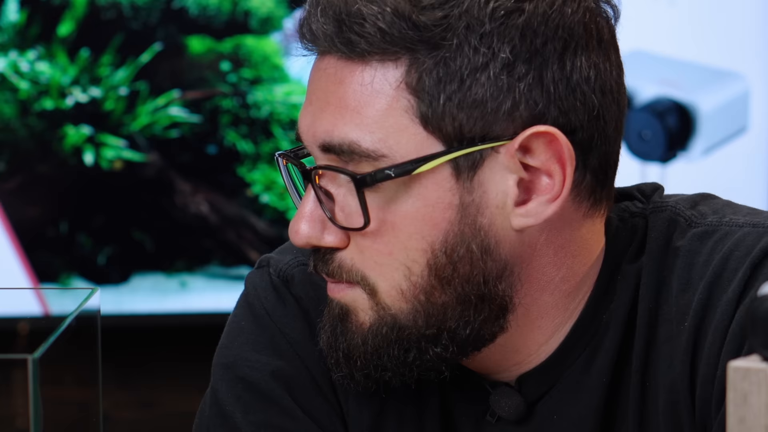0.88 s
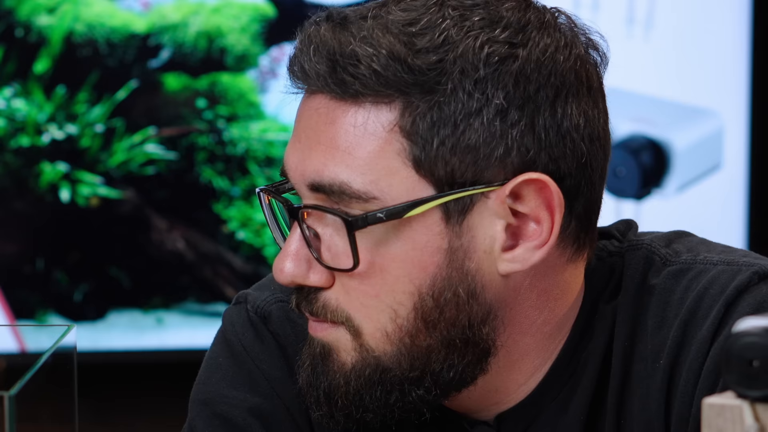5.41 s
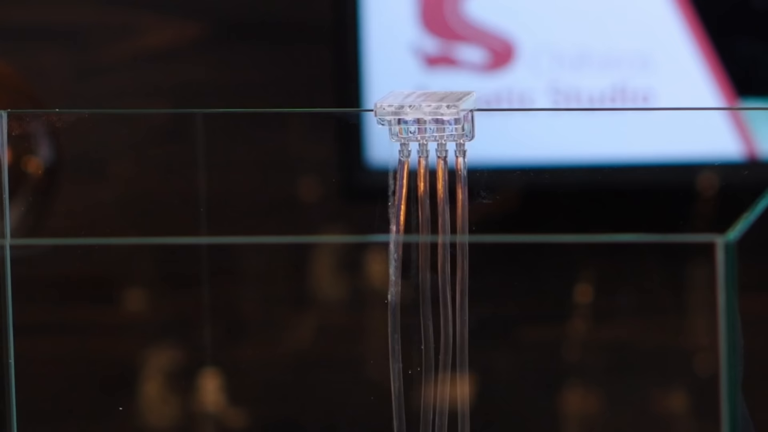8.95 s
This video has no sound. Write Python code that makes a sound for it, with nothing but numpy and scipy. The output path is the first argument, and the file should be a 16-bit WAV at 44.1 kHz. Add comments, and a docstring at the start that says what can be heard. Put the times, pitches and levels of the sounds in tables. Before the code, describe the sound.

Steady pulsing hum and rapid gear ticking of a small pump, with soft hiss, fine water spray and faint bubble pings.

```python
"""A small three-roller dosing pump runs on a desk and feeds a thin stream into an aquarium.
From the start each roller rubs and squeezes the tube: the gears load up, rattle and tick, and the desk
drones under them, over soft hiss and crackling spray. Just before 1 s comes a faint squeak, and bubbles
ping here and there. Around 5 s and again near 6.4 s the treble turns hollow and the hiss swells,
the second time with a low rumble. At 6.6 s the whole sound comes round again as a loop."""
import sys
import numpy as np
from scipy import signal
from scipy.io import wavfile
from scipy.ndimage import uniform_filter1d

SR = 44100
rng = np.random.default_rng(int(sys.argv[2]) if len(sys.argv) > 2 else 0)


def persist_wave(psi):
    """Save psi, clipped to +-1, as 16-bit WAV."""
    counts = np.round(np.clip(psi, -1, 1) * 32767).astype(np.int16)
    wavfile.write(sys.argv[1], SR, np.atleast_2d(counts).T)


N = 436149

PASS_HZ, ROLLER_COUNT = 12.412, 3  # a pass is one roller squeezing the tube
# how far the rotor trails an even pace: t/s, lag/s
ROTOR_LAG = [(0, .066), (1.45, .0702), (3.5, .068), (4.67, .0726), (5.15, .0716), (6.3, .0655), (6.6, .066)]
# gear load, peaking at the roller's bite, midway and at the release: middle/pass, width/pass, rise/dB
GEAR_LOAD = [(0.29, 0.41, 5.5), (0.091, 0.041, 4.5), (0.347, 0.056, 2), (0.58, 0.034, 5)]
# the hardest slaps, as the tube snaps open behind a roller: t/s, relative level/dB, treble offset/dB
HARD_SLAPS = [(0.0695, -37.5, -14), (0.2499, -37.0, -16), (0.7154, -36.0, -10), (0.7967, -37.5, -21),
              (1.2006, -36.5, -9), (1.5236, -38.0, -15), (1.6059, -37.5, -9), (1.6849, -37.0, -13),
              (2.128, -38.5, -19), (2.1681, -37.5, -13), (2.2655, -39.0, -18), (2.4094, -37.5, -14),
              (2.6511, -33.5, -17), (2.731, -36.5, -12), (2.8921, -35.0, -11), (2.9722, -36.0, -20),
              (3.134, -38.5, -21), (3.2144, -36.5, -18), (3.3749, -34.0, -10), (3.456, -37.0, -19),
              (3.6166, -36.5, -9), (3.7793, -37.5, -13), (3.8589, -34.5, -10), (3.94, -36.0, -15),
              (4.1017, -35.0, -12), (4.3057, -36.0, -16), (4.3447, -35.5, -14), (5.071, -37.5, -8),
              (5.3907, -39.0, -12), (5.552, -37.0, -12), (6.3537, -38.0, -12), (6.3712, -33.5, -12),
              (6.5957, -37.0, -12)]
# resonances of the pump's shell: f/Hz, width/Hz, gain/dB
SHELL_MODES = [(2240, 110, 12), (3156, 185, 5.4), (3730, 190, 9), (4920, 460, 9.1)]
# a neutral colour: f/Hz, level/dB
FLAT = [(20, 0), (20000, 0)]


def amp(db):
    """Decibels to gain."""
    return 10 ** (np.asarray(db) / 20)


def unit_rms(x):
    """Scales to an rms of 1."""
    return x / np.sqrt(np.mean(x ** 2) + 1e-20)


def add(mix, s, sound):
    """Mixes a sound in at s seconds."""
    part = mix[max(round(s * SR), 0):][:len(sound)]
    part += sound[:len(part)]


def clicks(times, sizes):
    """One impulse of each size at each time."""
    at = np.round(times * SR).astype(int)
    inside = (at >= 0) & (at < N)
    return np.bincount(at[inside], sizes[inside], N)


def humps(table, at, period=np.inf):
    """Bell-shaped swells in dB from rows of middle, width and rise; they may repeat with a period."""
    middle, width, db = np.transpose(table)[:, :, None]
    away = abs(at - middle) % period
    away = np.minimum(away, period - away)
    return (db * np.exp(-(away / width) ** 2)).sum(axis=0)


def ring(x, colour, modes=(), size=16384):
    """Plays x through a minimum-phase body with this broad colour and these resonances."""
    hz = abs(np.fft.fftfreq(size, 1 / SR))
    points, levels = np.transpose(colour)
    db = np.interp(np.log(hz + 1), np.log(points), levels)
    for centre, width, height in modes:
        db = db + height / (1 + (2 * (hz - centre) / width) ** 2)
    spectrum = np.exp(np.conj(signal.hilbert(np.log(amp(db)))))
    response = np.fft.ifft(spectrum).real
    return signal.oaconvolve(x, response[:size // 2])[:N]


def room(x, wet_db, t60):
    """Adds sparse reflections from the desk, the tank and the near walls; comes out at unit rms."""
    t = np.arange(SR // 2) / SR
    echoes = rng.standard_normal(len(t)) * (rng.random(len(t)) < 3000 / SR)
    tail = echoes * (t > .003) * np.exp(-np.log(1000) * t / t60)
    wet = signal.oaconvolve(x, tail / np.linalg.norm(tail))[:N]
    return unit_rms(x + amp(wet_db) * wet)


def lag_at(t):
    """Seconds by which the rotor trails an even pace at time t."""
    return np.interp(t, *np.transpose(ROTOR_LAG))


def pass_time(passes):
    """Time at which the rotor has made this many roller passes."""
    on_beat = passes / PASS_HZ
    return on_beat + lag_at(on_beat)


def rotor_position():
    """Roller passes made so far, sample by sample."""
    t = np.arange(N) / SR
    return (t - lag_at(t)) * PASS_HZ


def pass_numbers():
    """Numbers of the roller passes, from just before the start."""
    return np.arange(-1, int(N / SR * PASS_HZ) + 1)


def pulses(pattern, accents, spread_db, clear_s):
    """A pattern of hits in every rotor turn, never quite alike; accents replace hits within clear_s."""
    place, db, scatter = np.transpose(pattern)
    turn_starts = pass_numbers()[1::ROLLER_COUNT, None] - ROLLER_COUNT
    turn_starts = np.vstack([turn_starts, turn_starts[-1] + ROLLER_COUNT])
    late, hard = rng.standard_normal((2, len(turn_starts), len(pattern)))
    times = (pass_time(turn_starts + place) + scatter * late).ravel()
    levels = (db + spread_db * hard).ravel()
    accent_s, accent_db = np.transpose(accents)[:2]
    free = abs(times[:, None] - accent_s).min(axis=1) > clear_s
    return clicks(times[free], amp(levels[free])) + clicks(accent_s, amp(accent_db))


def gear_teeth(load_depth, repeat_share, per_pass=96):
    """Gear teeth knock under the load; part of their unevenness returns with every rotor turn."""
    # the three rollers load the gears unequally: level/dB
    roller_db = [0.73, 0.45, 1.36]
    tooth = (pass_numbers()[:, None] * per_pass + np.arange(per_pass)).ravel()
    per_turn = ROLLER_COUNT * per_pass
    wear, offset = rng.standard_normal((2, per_turn))[:, tooth % per_turn]
    force = np.sqrt(repeat_share) * wear + np.sqrt(1 - repeat_share) * rng.standard_normal(len(tooth))
    passes = (tooth + offset / 2) / per_pass
    load_db = load_depth * humps(GEAR_LOAD, passes, period=1)
    load_db += np.take(roller_db, tooth // per_pass % ROLLER_COUNT)
    return clicks(pass_time(passes), force * amp(load_db))


def desk_drone(sink_db_per_s=230):
    """Roller shoves and gear vibration drive the desk through the pump's feet, softer as the rotor lags."""
    # shoves in every rotor turn: position/passes, relative level/dB, timing scatter/s
    thumps = [(.185, -0.5, 0.00056), (.4, -4, 0.00046), (.63, -2, 0.00061), (1.22, -3, 0.00051),
              (1.41, -5, 0.00069), (1.62, -1.5, 0.00079), (2.235, -3, 0.00084), (2.62, -2, 0.00042)]
    # the loudest throbs of the low drone: t/s, relative level/dB
    throbs = [(.65, -3), (1.085, 1.5), (1.778, 1.5), (2.212, 3.5), (3.225, 4), (3.707, 2.5), (5.487, 2),
              (6.005, 6), (6.122, 4), (6.367, 1), (6.563, 2.5)]
    # the desk's boomy colour: f/Hz, level/dB
    desk = [(18, -56), (35, -35), (52, -33.5), (75, -8.5), (102, -7.5), (135, -14.5), (165, -8),
            (205, -2.5), (225, 1), (340, -0.5), (365, -6), (420, -12), (520, -23.5), (900, -52.5)]
    # its resonances: f/Hz, width/Hz, gain/dB
    desk_modes = [(257, 18, 3), (295, 16, 12), (340, 12, 6.5)]
    pulsing = unit_rms(ring(pulses(thumps, throbs, spread_db=1.5, clear_s=.008), desk, desk_modes))
    rumble = unit_rms(ring(gear_teeth(load_depth=.4, repeat_share=.4), desk, desk_modes))
    lag = lag_at(np.arange(N) / SR)
    level_db = -31.5 - sink_db_per_s * (lag - lag[0])
    return amp(level_db) * unit_rms(pulsing + amp(2.5) * rumble)


def gear_rattle():
    """The meshing teeth ring the plastic gearbox."""
    # the gearbox's midrange colour: f/Hz, level/dB
    gearbox = [(200, -16.5), (480, -11), (620, 0), (850, 2.5), (960, .5), (1170, 1), (1400, -7),
               (1660, -16), (1870, -3.5), (2250, -7.5), (2650, -19.5), (5000, -23), (7500, -22),
               (16000, -27.5)]
    # its resonances: f/Hz, width/Hz, gain/dB
    gearbox_modes = [(656, 24, 5.5), (732, 34, 6.5), (838, 30, 2.5), (888, 34, 4.5), (1005, 28, 4.5),
                     (1253, 42, 5), (1885, 170, 3.6)]
    mesh = ring(gear_teeth(load_depth=1.15, repeat_share=.18), gearbox, gearbox_modes)
    return amp(-43.3) * room(mesh, wet_db=-13, t60=.08)


def stray_slaps(per_s=34, range_db=7.5):
    """Loose slaps at random moments, more of them while the gears are loaded."""
    load = unit_rms(amp(humps(GEAR_LOAD, rotor_position(), period=1)))
    hits = rng.random(N) < per_s * load / SR
    return hits * amp(-42.5 - range_db * rng.random(N))


def shell_spot(hits, detune=.05, spread_db=3):
    """The shell rings a little differently at every spot where it is struck."""
    # the shell's bright, clicky colour: f/Hz, level/dB
    shell = [(400, -13), (900, -16), (1600, -21), (1950, -2), (2300, -4.5), (2650, -12.5), (3300, 1),
             (4350, -5.5), (5200, -3.5), (5900, -22), (7500, -26), (9200, -7.5), (13000, -20), (16000, -23)]
    shifts = rng.uniform(-1, 1, (len(SHELL_MODES), 2))
    modes = [(hz * (1 + detune * up), width, db + spread_db * loud)
             for (hz, width, db), (up, loud) in zip(SHELL_MODES, shifts)]
    return ring(hits, shell, modes)


def backlash_ticks(spots=12, rebound_s=.0011, rebound_db=-3.5, shell_gain_db=21.5):
    """The gears slap across their play, rebound once and ring the shell at one of several spots."""
    # slaps in every rotor turn: position/passes, relative level/dB, timing scatter/s
    backlash = [(.04, -38, .0003), (.128, -43.5, .0007), (.255, -44, .0009), (.548, -58, .0004),
                (1.052, -39.5, .0005), (1.135, -44.5, 0.00056), (1.262, -44, 0.00078),
                (1.544, -40.5, .0003), (2.039, -37.5, .0003), (2.112, -42, 0.00046), (2.27, -40.5, .002),
                (2.54, -45.5, 0.00033)]
    slaps = pulses(backlash, HARD_SLAPS, spread_db=1, clear_s=.003) + stray_slaps()
    at = np.flatnonzero(slaps)
    gaps = rebound_s * rng.uniform(.5, 1.5, len(at))
    rebounds = slaps[at] * amp(rebound_db) * rng.choice([-1, 1], len(at))
    struck_spot = rng.integers(0, spots, len(at))
    ticks = np.zeros(N)
    for spot in range(spots):
        here = struck_spot == spot
        ticks += shell_spot(clicks(at / SR, slaps[at] * here) + clicks(at / SR + gaps, rebounds * here))
    return amp(shell_gain_db) * np.std(ticks) * room(ticks, wet_db=-8.5, t60=.1)


def tube_rub():
    """Each roller drags over the tube with a soft, pulsing fizz that rings the shell."""
    # drag as the roller meets the tube and as it leaves: middle/pass, width/pass, rise/dB
    drag_swells = [(0.99, 0.24, 7), (.46, .16, 10.5)]
    # colour of the friction: f/Hz, level/dB
    friction = [(1000, -12), (1600, -3), (2000, 0), (2700, 0.5), (3500, 0.5), (6000, -1), (9200, -8),
                (12500, 0), (16000, -19)]
    drag = amp(humps(drag_swells, rotor_position(), period=1)) * rng.standard_normal(N)
    return amp(-56) * unit_rms(ring(drag, friction, SHELL_MODES))


def hiss():
    """A soft, steady bed of hiss, with a bright sizzle that swells twice and a rumble that swells once."""
    # colour of the bed: f/Hz, level/dB
    bed_colour = [(30, -10), (150, 16), (1000, 8), (2700, 3), (4800, 2), (6100, -2.5), (7400, -3),
                  (8700, -0.5), (11000, 2.5), (12600, -6.5), (14000, 2), (16000, -21)]
    # its treble peaks: f/Hz, width/Hz, gain/dB
    bed_peaks = [(6330, 110, 3), (6670, 350, 13.3), (14550, 350, 3)]
    # colour of the sizzle: f/Hz, level/dB
    sizzle_colour = [(2000, -20), (3900, -5), (4900, -3), (6200, -1), (7300, -11), (9500, -22),
                     (12000, -25), (16000, -20)]
    # colour of the rumble: f/Hz, level/dB
    rumble_colour = [(25, -45), (55, -10), (90, -6), (150, -1), (400, -51), (2000, -74)]
    t = np.arange(N) / SR
    sizzle_db = -68.5 + humps([(5.05, .55, 4.2), (6.35, .21, 10)], t)
    rumble_db = -51 + humps([(6.45, .075, 11)], t)
    bed = unit_rms(ring(rng.standard_normal(N), bed_colour, bed_peaks))
    sizzle = unit_rms(ring(rng.standard_normal(N), sizzle_colour))
    rumble = unit_rms(ring(rng.standard_normal(N), rumble_colour))
    return amp(-52.5) * bed + amp(sizzle_db) * sizzle + amp(rumble_db) * rumble


def spray(per_s=140, spread_db=4, clump_db=4, decay_s=.0057):
    """Tiny droplets land in louder and softer clumps, each a short burst of fizz."""
    # the spray's airy colour: f/Hz, level/dB
    fizz_colour = [(2000, -29), (5500, -1), (9000, 0), (12500, 4), (16000, -14)]
    t = np.arange(SR // 40) / SR
    clumps = unit_rms(uniform_filter1d(rng.standard_normal(N), size=5000))
    drop_db = spread_db * np.minimum(rng.exponential(size=N), 3) + clump_db * np.clip(clumps, -2, 2)
    drops = amp(drop_db) * (rng.random(N) < per_s / SR)
    envelope = signal.oaconvolve(drops, np.exp(-t / decay_s))[:N]
    return amp(-63) * unit_rms(ring(envelope * rng.standard_normal(N), fizz_colour))


def tube_snaps(edge_gain_db=10, decay_s=.0023):
    """The tube springs open with each of the hardest slaps and gives it a bright edge."""
    # colour of that edge: f/Hz, level/dB
    edge_colour = [(2000, -19), (5000, 5), (7500, -11.5), (13000, 0.5), (16000, -9)]
    t, edge = np.arange(SR // 50) / SR, np.zeros(N)
    for s, db, treble_db in HARD_SLAPS:
        burst = np.exp(-t / decay_s) * rng.standard_normal(len(t))
        add(edge, s, amp(db + treble_db + edge_gain_db) * burst)
    return ring(edge, edge_colour)


def squeak(start_s=.74):
    """A faint, wavering whistle far up in the treble, ending in a lower chirp."""
    # the whistle's glide: t/s from the squeak's start, f/Hz, level/dB
    whistle = [(0, 11900, -63), (.03, 11450, -60.5), (.12, 11050, -57.5), (.16, 11400, -62),
               (.22, 12750, -61), (.26, 12450, -61), (.3, 12650, -62)]
    # the chirp's glide: t/s from the squeak's start, f/Hz, level/dB
    chirp = [(.275, 7050, -57), (.295, 7280, -54), (.32, 7100, -59)]
    out = np.zeros(N)
    for glide in (whistle, chirp):
        s, hz, db = np.transpose(glide)
        t = np.arange(s[0], s[-1], 1 / SR)
        waver = 1 + .003 * unit_rms(uniform_filter1d(rng.standard_normal(len(t)), size=60))
        cycles = np.cumsum(np.interp(t, s, hz) * waver) / SR
        add(out, start_s + s[0], amp(np.interp(t, s, db)) * np.sin(2 * np.pi * cycles))
    return out


def faint_bubbles(count=30, per_s=.7, typical_hz=7600, spread_octaves=.12, db=-54, splash_db=-8):
    """Cues for small bubbles at random moments, all of about one size."""
    times = np.cumsum(rng.exponential(size=count)) / per_s
    pitches = typical_hz * 2 ** (spread_octaves * rng.standard_normal(count))
    return [(s, db, hz, splash_db) for s, hz in zip(times, pitches)]


def bubbles(attack_s=.0003, decay_s=.0083, rise_per_s=1.5):
    """A drop splashes, and its tiny bubble rings briefly with rising pitch."""
    # the clearest bubbles in the tank: t/s, level/dB, f/Hz, splash against the ping/dB
    clear_bubbles = [(.906, -48, 6160, 0), (.917, -50, 5070, 3), (1.407, -49, 7400, -2),
                     (1.759, -49, 7600, -4), (3.558, -45, 7500, -5), (4.29, -48, 6200, -2),
                     (5.57, -53, 6260, 6), (5.749, -44.5, 5400, 1), (6.222, -43, 4400, -5),
                     (6.37, -42, 4900, 0)]
    t, out = np.arange(SR // 20) / SR, np.zeros(N)
    envelope = np.exp(-t / decay_s) * (1 - np.exp(-t / attack_s))
    for s, db, hz, splash_db in clear_bubbles + faint_bubbles():
        ping = np.sin(2 * np.pi * np.cumsum(hz * (1 + rise_per_s * t)) / SR)
        band = signal.butter(2, [.87 * hz, 1.28 * hz], "bandpass", fs=SR)
        splash = unit_rms(signal.lfilter(*band, rng.standard_normal(len(t))))
        add(out, s, amp(db) * envelope * (ping + amp(splash_db) * splash))
    return out


def hollowed(x):
    """For two stretches the treble takes on a hollow, notched colour."""
    # the hollow stretches: start/s, end/s, fade/s
    stretches = [(4.53, 5.58, 0.092), (6.217, 6.52, .04)]
    # their peaks and notches: f/Hz, width/Hz, gain/dB
    hollow_modes = [(2150, 200, -2.5), (2620, 190, 4.5), (3300, 330, -2), (4230, 350, -4), (4800, 320, 2.5),
                    (5340, 300, -11), (5620, 350, 7), (7200, 220, 1), (7600, 500, -0.5), (9500, 350, -2.5),
                    (10000, 450, 2.5), (12160, 450, 6), (12750, 280, -3), (13300, 650, 4)]
    t = np.arange(N) / SR
    blend = sum(np.clip(np.minimum(t - start, end - t) / fade + .5, 0, 1)
                for start, end, fade in stretches)
    return (1 - blend) * x + blend * ring(x, FLAT, hollow_modes)


def looped(x, loop_s=6.6066, fade_samples=1000):
    """An equal-power crossfade brings the beginning back after one loop."""
    seam = round(loop_s * SR)
    angle = np.clip((np.arange(N) - seam) / fade_samples, 0, 1) * np.pi / 2
    return np.cos(angle) * x + np.sin(angle) * np.roll(x, seam)


def scene():
    """Pump and hiss, coloured by the housing, join the water in a mono loop."""
    # treble resonances and notches of the pump's housing: f/Hz, width/Hz, gain/dB
    housing_modes = [(8330, 260, 5), (9300, 430, 5.5), (9520, 440, -4.5), (12000, 250, -3.5),
                     (12900, 260, 1), (13200, 380, -5), (14200, 200, -5), (14500, 420, 0)]
    gears = desk_drone() + gear_rattle() + backlash_ticks()
    tube = tube_rub() + tube_snaps() + squeak()
    pump = ring(gears + tube + hiss(), FLAT, housing_modes)
    return looped(hollowed(pump) + bubbles() + spray())[None]


def record(dry):
    """A steep low-pass takes off the air above 15850 Hz."""
    lowpass = signal.firwin(511, 15850, window=("kaiser", 9), fs=SR)
    return signal.oaconvolve(dry, lowpass[None], "same")


dry = scene()
out = record(dry)
persist_wave(out)
```